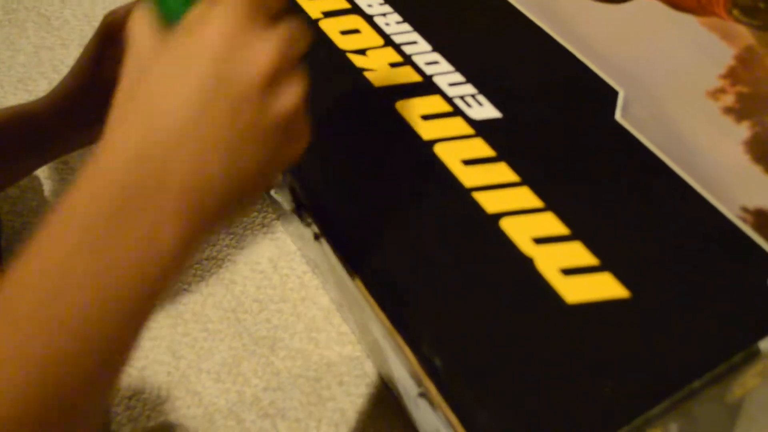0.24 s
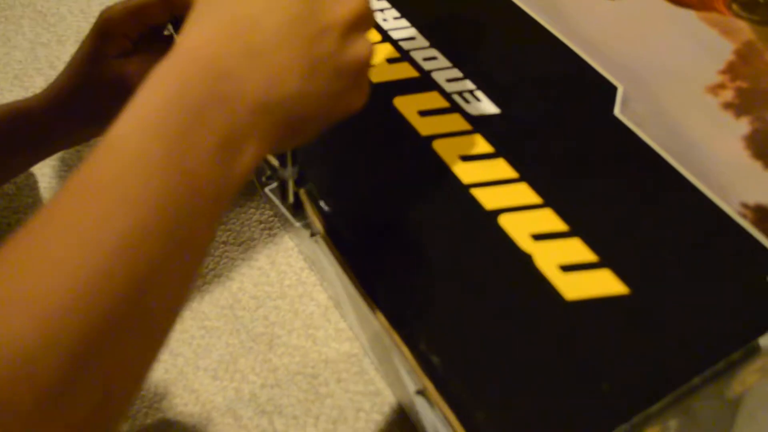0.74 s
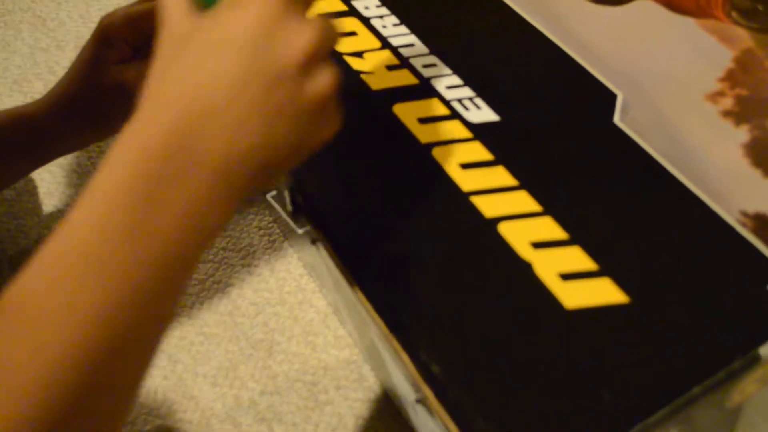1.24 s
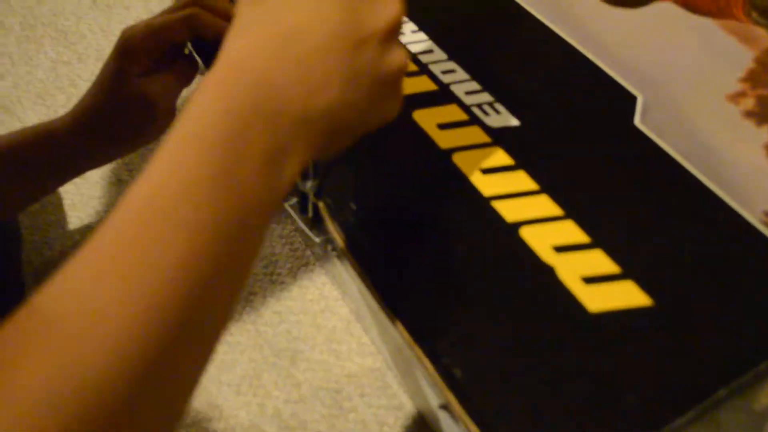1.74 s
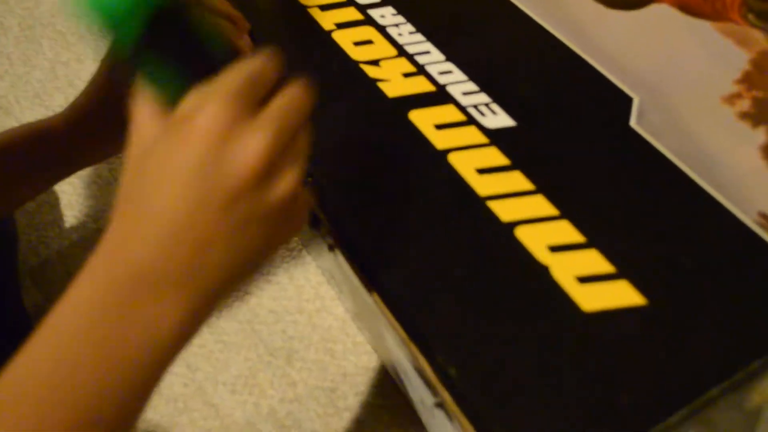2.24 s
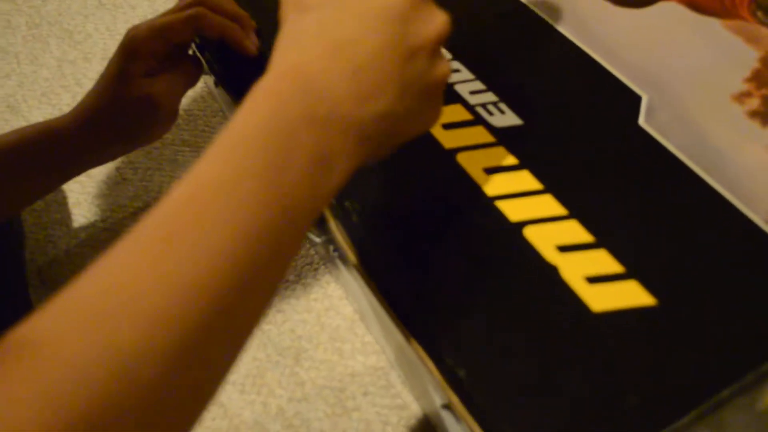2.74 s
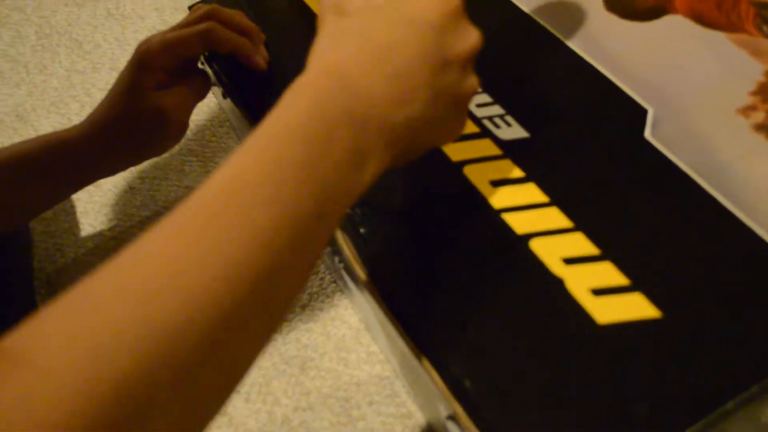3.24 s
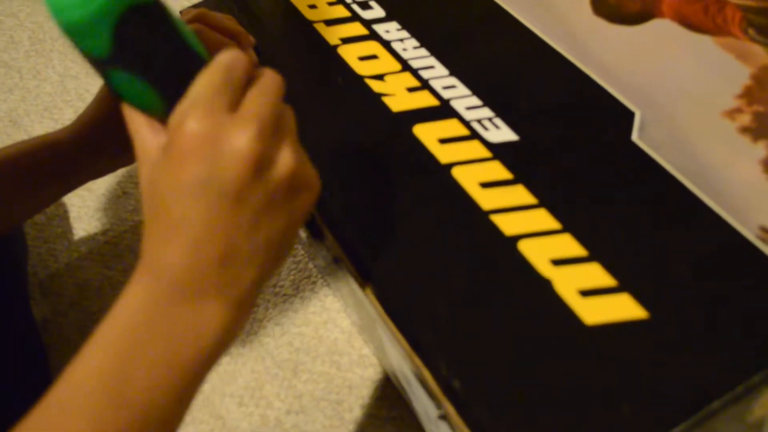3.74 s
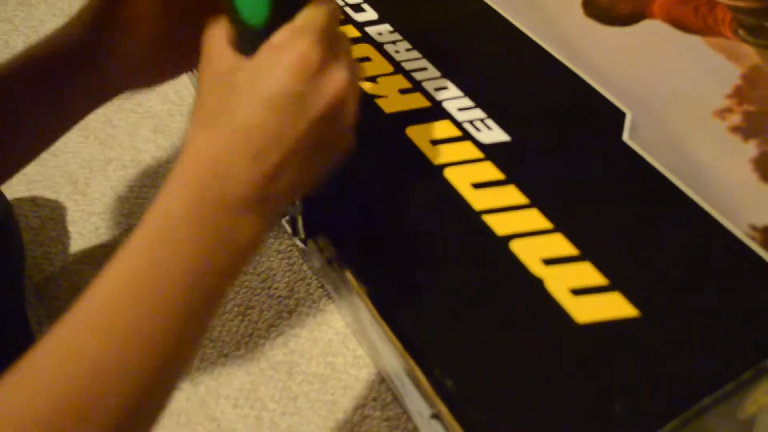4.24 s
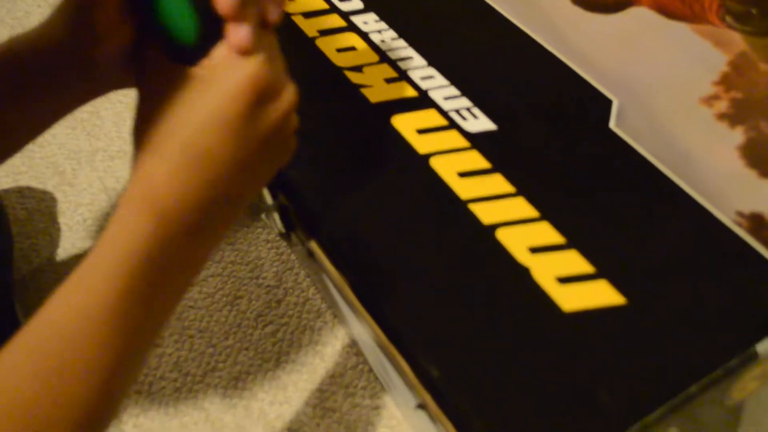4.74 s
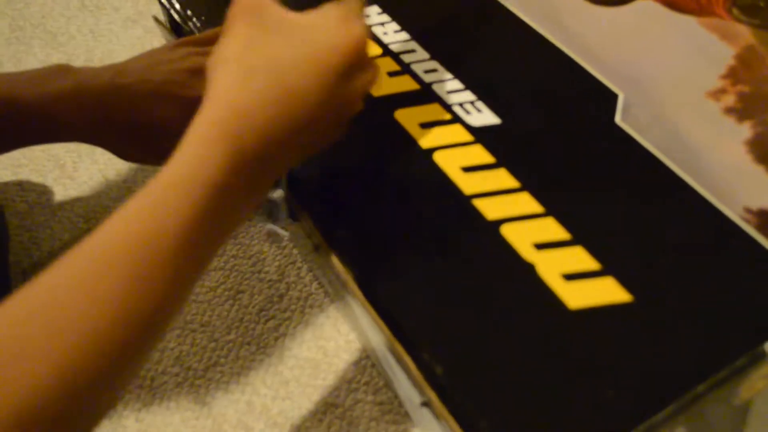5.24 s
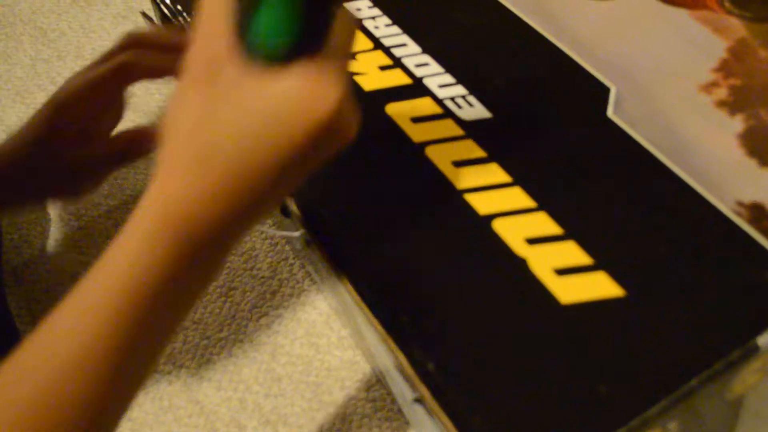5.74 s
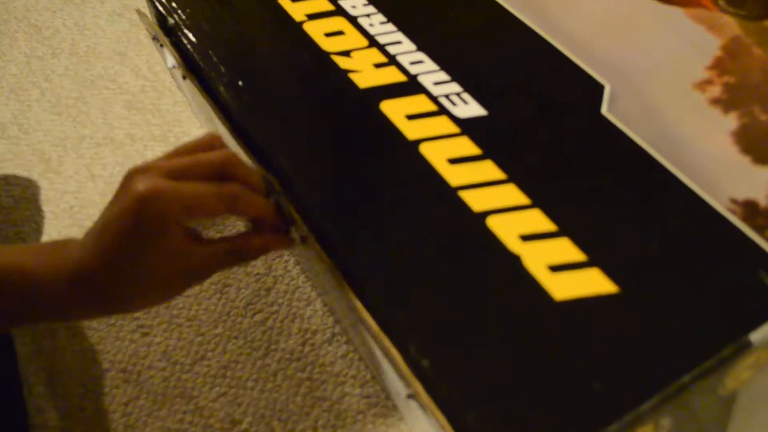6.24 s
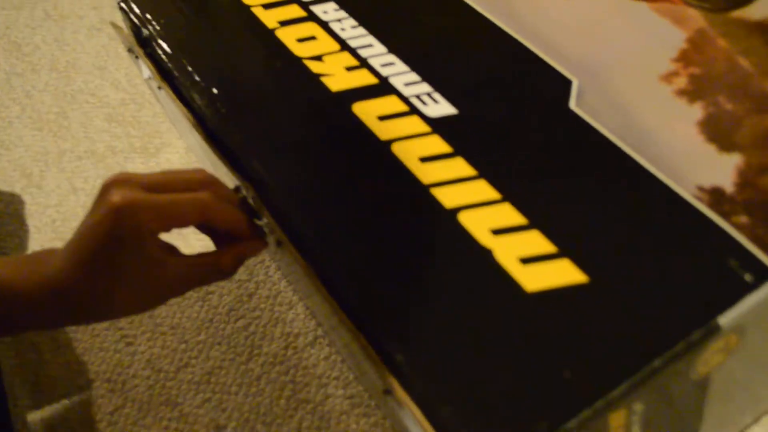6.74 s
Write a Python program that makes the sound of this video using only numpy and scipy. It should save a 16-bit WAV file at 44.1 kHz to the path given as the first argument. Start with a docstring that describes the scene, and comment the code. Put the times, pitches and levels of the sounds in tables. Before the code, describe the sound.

Quiet scrapes, dull cardboard thuds and tiny metallic clicks in a carpeted room build to two sharp snaps as a staple springs free.

```python
"""A screwdriver levers staples out of a large cardboard box lying on a carpet in a quiet room.
The tip knocks and grinds on the board, which booms briefly: blows and dense slips ring the box modes.
Steel ticks on steel as short pitched grit and ringing wire; late on, the last staple snaps free.
A faint room answer follows, and a steady room and microphone hiss, shaped noise, lies below."""
import sys
import numpy as np
from scipy import signal
from scipy.fft import rfft, irfft, next_fast_len
from scipy.io import wavfile
from scipy.ndimage import uniform_filter1d

SR = 44100
rng = np.random.default_rng(int(sys.argv[2]) if len(sys.argv) > 2 else 0)


def bounce(signal):
    """Save signal as a 16-bit WAV file at the path given by the first command-line argument."""
    frames = np.transpose(np.atleast_2d(signal))
    limited = np.clip(frames, -1, 1)
    pcm = np.round(limited * 32767).astype(np.int16)
    wavfile.write(sys.argv[1], SR, pcm)


def invert_db(level):
    """Linear amplitude ratio for a level in decibels (20 dB per decade), elementwise."""
    return 10 ** (np.asarray(level, dtype=float) / 20)


N = 307818

# Blows on the board, levels ahead of each part's trim:
# start_s, rim_level_db, panel_level_db, cavity_level_db, edge_level_db
BLOWS = [(0.002, -52, -48, -68.5, -75), (0.319, -29, -29, -54.5, -42.5), (0.396, -41, -44.5, -70, -72),
         (0.415, -54, -48, -64, -71), (0.426, -39, -43.5, -64, -77), (0.456, -51, -45.5, -66, -56),
         (0.52, -65, -58, -62, -77), (0.6, -59, -58, -53.5, -74), (0.915, -65, -63, -58.5, -75),
         (1.11, -44.5, -49.5, -65, -54.5), (1.277, -71, -49, -52.5, -67), (1.677, -35, -42.5, -66, -54.5),
         (1.934, -44, -40.5, -55, -55), (1.959, -29.5, -31, -57, -46), (1.984, -38, -28.5, -53.5, -50),
         (2.175, -44, -42, -50.5, -53.5), (2.224, -38, -34.5, -53, -57), (2.377, -63, -47.5, -50.5, -74),
         (3.465, -38, -35, -46, -61), (3.569, -34.5, -34.5, -55, -49), (3.735, -46, -46, -66, -80),
         (3.827, -37.5, -36.5, -41, -45.5), (3.906, -41, -41, -65, -55), (3.983, -36, -44, -65, -62),
         (4.006, -58, -50, -46.5, -63), (4.188, -63, -47, -55, -72), (4.284, -60, -55, -51.5, -72),
         (4.554, -34, -39.5, -63, -63), (4.564, -36, -40.5, -59, -64), (4.598, -43, -44, -72, -66),
         (4.618, -31.5, -40.5, -72, -68), (4.631, -38, -46, -71, -59), (4.834, -51, -43.5, -56, -71),
         (4.95, -57, -51, -51, -74), (5.048, -41, -40, -60, -63), (5.066, -33, -22, -50, -42),
         (5.076, -28.5, -27, -48, -39.5), (5.182, -40, -46, -51.5, -77), (5.244, -2, -8, -33.5, -21),
         (5.265, -32, -32, -38.5, -42), (5.278, -22, -39, -46, -37.5), (5.297, -53, -23.5, -59, -36),
         (5.621, -23, -29, -58, -31.5), (5.632, -43, -28, -48.5, -34), (5.68, -47, -31, -62, -45),
         (5.789, -50, -72, -84, -56), (5.816, -53, -75, -75.5, -47.5), (5.824, -48, -75.5, -74, -66),
         (6.145, -49, -40, -60, -72), (6.52, -62, -58, -60, -72), (6.615, -39.5, -45, -69, -55.5),
         (6.815, -49.5, -51, -60, -53), (6.94, -34, -38, -55, -47)]
# Clear touches of the steel tip on staple wire, levels ahead of any trim:
# start_s, touch_level_db, pitch_hz, wire_ring_level_db
TIP_TOUCHES = [(0.319, -59, 6130, -48.5), (0.3604, -56, 9040, -75), (0.575, -50, 11350, -72),
               (1.05, -49, 5600, -55.5), (1.11, -60, 13900, -59), (1.2863, -51.5, 10600, -74),
               (1.9086, -54.5, 5010, -64), (1.96, -45, 5000, -70), (2.23, -48, 6370, -69),
               (2.6115, -55, 12000, -77), (2.632, -53, 8380, -75), (2.7925, -58, 8100, -77),
               (2.9274, -59, 8380, -77), (3.014, -59, 8500, -75), (3.055, -58, 7480, -75),
               (3.412, -52.5, 5200, -76), (3.569, -57, 5200, -56), (3.8283, -38.5, 5000, -47.5),
               (3.984, -62, 5200, -54), (4.004, -62, 5200, -57.5), (3.994, -64, 5200, -58),
               (4.016, -64, 5200, -56), (4.0257, -49, 8960, -55), (4.353, -63, 5200, -56.5),
               (4.554, -54, 5200, -61), (4.9448, -49.5, 11100, -73), (5.062, -44.5, 5170, -47),
               (5.0674, -56, 5370, -38.5), (5.078, -39.5, 4870, -45.5), (5.1607, -50.5, 6800, -73),
               (5.245, -21, 7100, -25.5), (5.267, -25, 7900, -28.5), (5.2768, -30, 5410, -31),
               (5.2972, -37.5, 9600, -41), (5.5727, -49, 5170, -66), (5.6215, -16.5, 9100, -24.5),
               (5.6735, -33, 6700, -43), (5.7805, -53, 6000, -57), (5.7902, -48, 6200, -54),
               (5.815, -62, 5170, -56), (6.6149, -60, 7500, -61), (6.8163, -41.5, 5560, -58)]
# Modes of the air in the box, the broad panel, the stiff rim, the board edge and a staple's bent wire:
# pitch_hz, level_db, t60_s
CAVITY_MODES = [(65, -20, .1), (108, -4, .22)]
PANEL_MODES = [(162, -11, 0.034), (212.3, -1.5, 0.064), (262, -5.5, 0.057), (275, 0, 0.066),
               (320, 0, 0.049), (400, -2.5, 0.046), (528.7, -9, 0.083)]
RIM_MODES = [(646, 2, 0.025), (768, -4, 0.05), (896, -1, 0.046), (1030, 4, 0.025), (1183, 5, 0.014),
             (1332, -5.5, 0.043)]
EDGE_MODES = [(1565, -0.5, 0.012), (1754, -4, 0.013), (1880, -3.5, 0.011), (2320, -10.5, 0.007)]
WIRE_MODES = [(2470, 0, 0.0073), (3190, 0, 0.011), (3690, -1.5, 0.0073), (4080, -6, 0.0068),
              (4444, -10, .008)]


def rms_one(x):
    """Scales a signal to rms 1."""
    return x / np.sqrt(np.mean(x ** 2) + 1e-20)


def coloured(spectrum):
    """Steady noise of rms 1, its spectrum drawn through (Hz, dB per Hz) points on a log pitch axis."""
    hz, level_db = np.transpose(spectrum)
    log_hz = np.log(np.arange(N // 2 + 1) * SR / N + 1)
    gain = invert_db(np.interp(log_hz, np.log(hz), level_db, -80, -80))
    return rms_one(irfft(rfft(rng.standard_normal(N)) * gain, N))


def room_hiss():
    """Quiet room and microphone: steady noise with a fixed spectrum."""
    # Hiss spectrum: pitch_hz, density_db_per_hz
    hiss_spectrum = [(15, -28), (25, -11), (32, -11), (76, 0), (249, -11), (335, 0), (416, -2), (451, -3.5),
                     (659, 0), (887, -1), (2910, -10.5), (6380, -24.5), (12200, -27), (16000, -33.5)]
    return invert_db(-65.5) * coloured(hiss_spectrum)


def room_answer(x):
    """Walls: twelve feedback delays, duller on every round, smeared by three allpasses."""
    t60_s, wall_cut_hz, gain_db = 0.3, 8200, -26.5   # the t60 holds in the bass
    size = next_fast_len(N + SR // 2)
    turn = np.exp(-2j * np.pi * np.arange(size // 2 + 1) / size)   # one sample of delay
    dull = np.exp(-2 * np.pi * wall_cut_hz / SR)
    low_pass = (1 - dull) / (1 - dull * turn)
    answer = 0
    lags = (rng.uniform(0.0088, 0.021, 12) * SR).astype(int)
    for k, lag in enumerate(lags):
        loop = invert_db(-60 * lag / SR / t60_s) * low_pass * turn ** lag
        answer = answer + (-1) ** k * loop / (1 - loop)
    for lag in (47, 113, 241):   # samples
        answer = answer * (turn ** lag - .65) / (1 - .65 * turn ** lag)
    return invert_db(gain_db) * irfft(rfft(x, size) * answer, size)[:N]


def soften(x, hz):
    """A contact that lasts a while: two one-pole low-passes."""
    r = np.exp(-2 * np.pi * hz / SR)
    return signal.lfilter([(1 - r) ** 2], [1, -2 * r, r * r], x + 1e-18)


def ring(clicks, hz, t60):
    """A unit click sets a dying sine of starting height 1 ringing, through a two-pole resonator."""
    r = invert_db(-60 / (max(t60, .002) * SR))
    w = 2 * np.pi * min(hz, 18000) / SR
    return signal.lfilter([0, np.sin(w)], [1, -2 * r * np.cos(w), r * r], clicks + 1e-18)


def grains(per_s, spread_db):
    """Slips at random moments and of random sign; spread_db sets how uneven their sizes are."""
    sizes = invert_db(spread_db * np.minimum(rng.exponential(1, N), 5))
    signs = rng.choice([-1, 1], N)
    return sizes * signs * (rng.random(N) < per_s / SR)


def struck(seconds, blow_db, modes, scatter_db, contact_hz, broad):
    """Each blow strikes each mode with its own strength; a broad push starts them in phase, a point does not."""
    at = np.round(seconds * SR).astype(int)
    out = np.zeros(N)
    chance = rng.standard_normal((len(at), len(modes)))
    for k, (hz, level_db, t60) in enumerate(modes):
        sign = 1 if broad else (-1) ** k
        clicks = np.zeros(N)
        clicks[at] = sign * invert_db(blow_db + level_db + scatter_db * chance[:, k])
        out += ring(clicks, hz, t60)
    # little radiates under the lowest mode
    low_cut = signal.butter(4, .9 * modes[0][0], "high", fs=SR, output="sos")
    return signal.sosfilt(low_cut, soften(out, contact_hz))


def rubbed(effort, modes, per_s, spread_db, contact_hz):
    """Dense slips ring in the same modes; effort is about the rms they reach."""
    def body(force):
        """All modes answer one force, neighbours in opposite phase."""
        soft = soften(force, contact_hz)
        return sum((-1) ** k * invert_db(db) * ring(soft, hz, t60) for k, (hz, db, t60) in enumerate(modes))
    one_slip = body(np.arange(SR // 2) == 0)
    slips = rms_one(grains(per_s, spread_db)) * effort
    return body(slips) / np.sqrt(np.sum(one_slip ** 2))


def strokes():
    """Effort of short tip strokes on panel, rim, edge and skin: each swells and stops; the cavity stays at rest."""
    # Short strokes of the tip over board and wire:
    # start_s, length_s, panel_level_db, rim_level_db, edge_level_db, slide_level_db (ahead of any trim)
    scrape_rows = [(0.248, 0.065, -50.5, -54.5, -49.5, -74.5), (0.394, 0.1, -68, -69, -89, -88),
                   (0.523, 0.071, -56.5, -70, -83, -87), (0.93, 0.13, -65, -74, -72, -93),
                   (1.475, 0.28, -69, -79, -82, -100), (1.877, 0.081, -57, -66, -64, -77.5),
                   (2.183, 0.061, -50.5, -63, -68, -77), (3.387, 0.066, -50.5, -45.5, -52, -79),
                   (3.715, 0.085, -61, -61, -68, -75.5), (3.828, 0.073, -53, -64, -66, -87),
                   (3.959, 0.095, -41, -48.5, -64, -74.5), (4.102, 0.093, -74, -75, -78, -71.5),
                   (4.236, 0.14, -58, -66.5, -73, -77.5), (4.395, 0.15, -69, -80, -84, -88),
                   (4.537, 0.13, -60, -70, -78, -79.5), (4.787, 0.24, -72, -78, -94, -77),
                   (5.037, 0.071, -43.5, -48, -67, -70), (5.18, 0.1, -55, -46, -58, -64.5),
                   (5.569, 0.057, -48, -63.5, -65.5, -67), (5.664, 0.041, -67.5, -55.5, -52.5, -54.5),
                   (5.745, 0.16, -85, -77, -68, -74), (6.255, 0.09, -76, -68, -72, -74),
                   (6.415, 0.18, -62.5, -72, -85, -104), (6.693, 0.052, -69, -64, -69, -76)]
    effort = np.zeros((5, N))
    t = np.arange(N) / SR
    for start, length, *level_db in scrape_rows:
        span = slice(round(start * SR), round((start + length) * SR))
        swell = np.sin(np.pi * np.clip((t[span] - start) / length, 0, 1)) ** 1.45
        effort[:4, span] += np.outer(invert_db(level_db), swell)
    return effort


def shudders():
    """Loose flaps and wire: knocks shake panel, rim, edge and cavity, ticks the skin, and it dies away."""
    # Shaking of panel, rim, edge, skin and cavity in turn: below_blow_db, t60_s
    shudder_rows = [(17, 0.15), (23.76, 0.16), (16, 0.15), (37.8, 0.25), (3, 0.29)]
    s, rim_db, panel_db, cavity_db, edge_db = np.transpose(BLOWS)
    tick_s, tick_db, _, _ = np.transpose(TIP_TOUCHES)
    effort = np.zeros((5, N))
    causes = [(s, panel_db), (s, rim_db), (s, edge_db), (tick_s, tick_db), (s, cavity_db)]
    for k, ((when, db), (below_db, t60)) in enumerate(zip(causes, shudder_rows)):
        effort[k, np.round(when * SR).astype(int)] = invert_db(db - below_db)
        effort[k] = signal.lfilter([1], [1, -invert_db(-60 / (t60 * SR))], effort[k] + 1e-18)
    return effort


def rocking(effort):
    """The box bobs on its air spring: the upper cavity mode swells with the effort and wavers in pitch."""
    rise_hz, wander_hz, rumble_db = 21, 2.19, -5.5
    wander = rms_one(soften(rng.standard_normal(N), 3.16))
    phase = 2 * np.pi * np.cumsum(CAVITY_MODES[1][0] + wander_hz * wander) / SR
    bob = np.sqrt(2) * soften(effort, rise_hz) * np.sin(phase)
    rumble = rubbed(effort * invert_db(rumble_db), CAVITY_MODES, 600, spread_db=-1.0, contact_hz=119.9)
    return bob + rumble


def prying():
    """Levering rocks the box, creaks the board, grinds rim and edge and slides over printed skin and wire."""
    # Steady pressure of hands and tip: time_s, creak_level_db, grind_level_db (grind ahead of its trims)
    pressure = [(0.0, -68, -66), (0.23, -73.5, -72), (0.33, -53.5, -64), (0.6, -66.5, -63.5),
                (0.84, -72.5, -75), (0.95, -66.5, -64.5), (1.32, -71, -67), (1.46, -75.5, -66.5),
                (1.85, -67, -61.5), (2.44, -69, -64.5), (2.7, -78.5, -73), (3.34, -72.5, -69),
                (3.6, -73, -68), (4.1, -64.5, -65), (4.45, -60, -58), (4.76, -71, -64.5),
                (4.98, -61.5, -60), (5.44, -61.5, -62.5), (5.6, -62, -55.5), (5.85, -78, -62),
                (6.1, -73.5, -62), (6.2, -66, -59.5), (6.98, -67, -62)]
    # Slide hiss spectrum: pitch_hz, density_db_per_hz
    slide_spectrum = [(2500, -22), (4000, 5), (6000, 1.5), (9000, 1.5), (12000, -8.5), (15500, -13)]
    time_s, creak_db, grind_db = np.transpose(pressure)
    t = np.arange(N) / SR
    creak_db = np.interp(t, time_s, creak_db)
    grind_db = np.interp(t, time_s, grind_db)
    panel, rim, edge, skin, cavity = strokes() + shudders()
    # the slide hiss flickers with sparse slips
    flicker = rms_one(uniform_filter1d(np.abs(grains(360, spread_db=0.0)), size=60))
    slide = skin * rms_one(coloured(slide_spectrum) * (0.5 + 0.22 * flicker))
    creak = rubbed(invert_db(creak_db) + panel, PANEL_MODES, 1200, spread_db=3.5, contact_hz=530)
    rim_grind = rubbed(invert_db(grind_db - 9.0) + rim, RIM_MODES, 1300, spread_db=3.5, contact_hz=1930)
    edge_grind = rubbed(invert_db(grind_db - 10.0) + edge, EDGE_MODES, 1500, spread_db=3.0, contact_hz=5000)
    wire = rubbed(skin * invert_db(1.5), WIRE_MODES, 2300, spread_db=3, contact_hz=8000)
    return rocking(cavity) + creak + rim_grind + edge_grind + wire + slide


def probing():
    """The tip feels for the wire: faint touches, roughly spread over each span, of one level and random pitch."""
    # Spans of feeling about: start_s, end_s, touches (count)
    probe_spans = [(0.03, 0.06, 1), (0.34, 0.38, 2), (0.62, 0.76, 3), (1.45, 1.49, 1), (2.49, 2.7, 4),
                   (2.82, 3.05, 6), (3.16, 3.29, 3)]
    touch_db, low_hz, high_hz = -58.5, 7200, 12500   # level ahead of any trim
    rows = []
    for start, end, count in probe_spans:
        for k, (when, place) in enumerate(rng.random((count, 2))):
            touch_s = start + (end - start) * (k + when) / count
            rows.append((touch_s, touch_db, low_hz * (high_hz / low_hz) ** place))
    return rows


def ticks():
    """Steel touches: brief grit pitched by the free stretch of wire; blade and bent wire ring along."""
    # Wire and blade modes, all stirred by a touch: pitch_hz, level_db, t60_s
    steel_modes = [(5050, -46, .004), (6800, -6, .004), (8140, 1.5, 0.0032), (9220, 2, 0.0027),
                   (11650, -0.5, 0.0033), (13800, -16, .003)]
    touches = [row[:3] for row in TIP_TOUCHES] + probing()
    s, touch_db, _ = np.transpose(touches)
    wire_s, _, _, wire_db = np.transpose(TIP_TOUCHES)
    out = struck(s, touch_db - 9, steel_modes, scatter_db=2.5, contact_hz=12000, broad=False)
    out = out + struck(wire_s, wire_db, WIRE_MODES, scatter_db=2.0, contact_hz=5800, broad=False)
    t = np.arange(round(.012 * SR)) / SR
    for start, db, hz in touches:
        grit = rng.standard_normal(len(t)) * invert_db(db - 4.5 - 60 * t / 0.0094)   # t60 9.4 ms
        band = signal.butter(2, [hz / 1.4, min(hz * 1.4, 15000)], "band", fs=SR)
        at = round(start * SR)
        out[at:at + len(t)] += signal.lfilter(*band, grit)
    return out


def knocks():
    """Blows on the board: boom of the cavity, thud of the panel, crack of rim and edge."""
    s, rim_db, panel_db, cavity_db, edge_db = np.transpose(BLOWS)
    boom = struck(s, cavity_db - 0.5, CAVITY_MODES, scatter_db=2.5, contact_hz=90.8, broad=True)
    thud = struck(s, panel_db - 5.5, PANEL_MODES, scatter_db=0.5, contact_hz=500, broad=True)
    rim_crack = struck(s, rim_db - 14, RIM_MODES, scatter_db=4, contact_hz=1770, broad=True)
    edge_crack = struck(s, edge_db + 10.5, EDGE_MODES, scatter_db=3.5, contact_hz=3960, broad=False)
    return boom + thud + rim_crack + edge_crack


def scene():
    """The worked box, the room's answer to it and the hiss below; a box radiates no deep bass."""
    box = knocks() + ticks() + prying()
    low_cut = signal.butter(2, 55, "high", fs=SR, output="sos")   # Hz
    box = signal.sosfilt(low_cut, box)
    return (box + room_answer(box) + room_hiss())[None]


def top_cut(x):
    """Nothing passes above the cut-off."""
    return signal.sosfilt(signal.butter(12, 16600, fs=SR, output="sos"), x)


def record(dry):
    """The converter adds a small constant offset."""
    mix = dry + .0006
    return top_cut(mix)


dry = scene()
out = record(dry)
bounce(out)
```